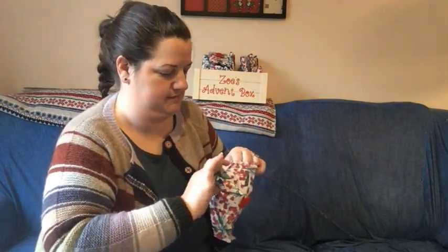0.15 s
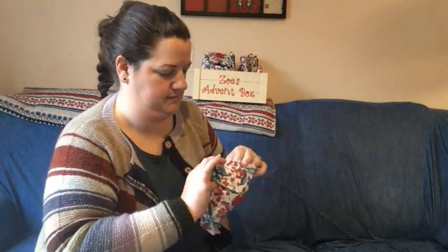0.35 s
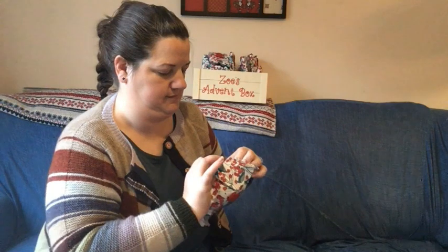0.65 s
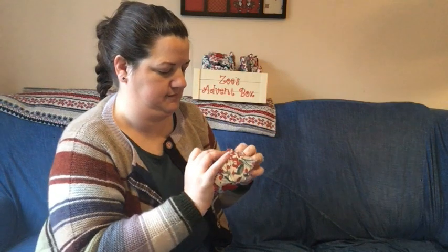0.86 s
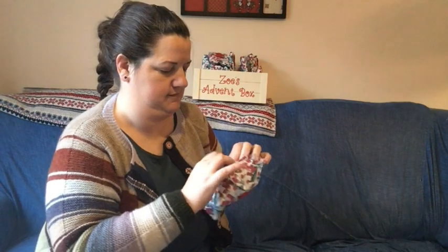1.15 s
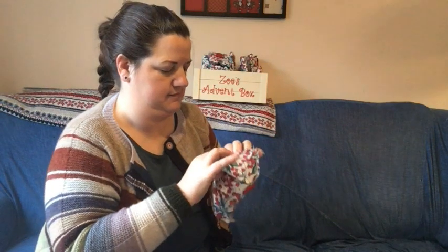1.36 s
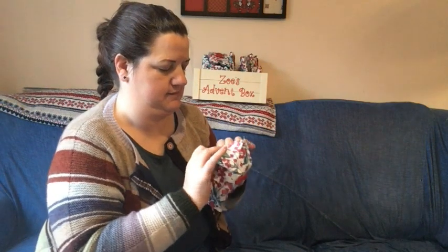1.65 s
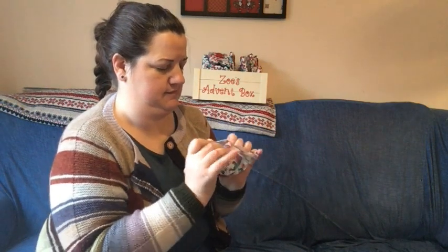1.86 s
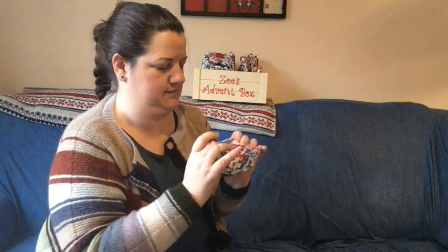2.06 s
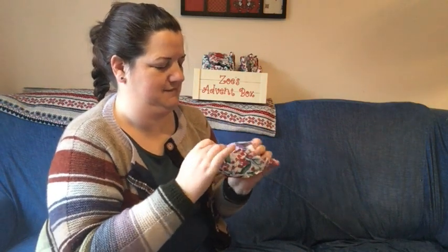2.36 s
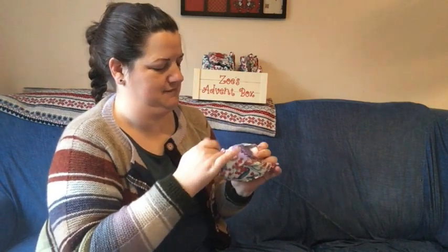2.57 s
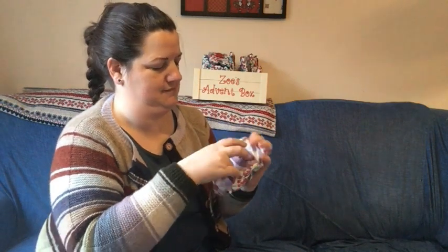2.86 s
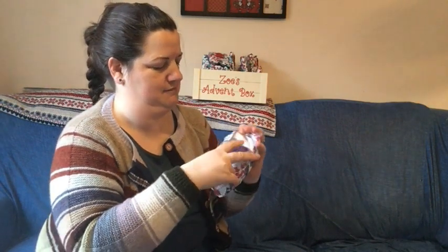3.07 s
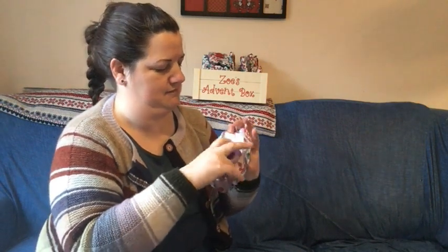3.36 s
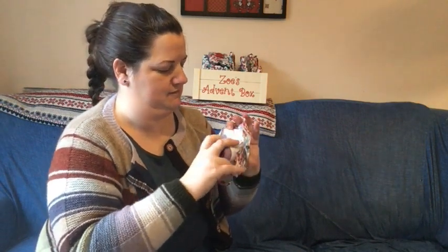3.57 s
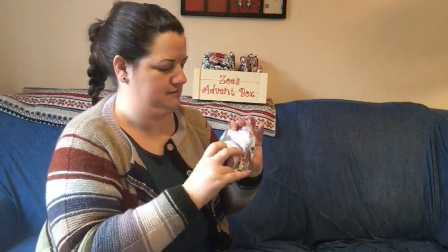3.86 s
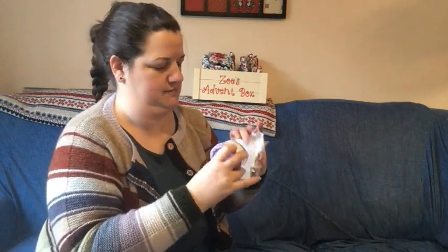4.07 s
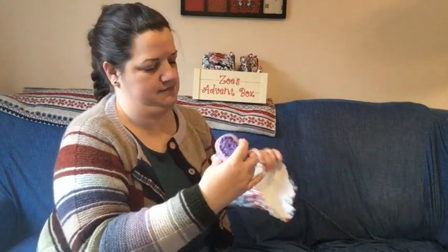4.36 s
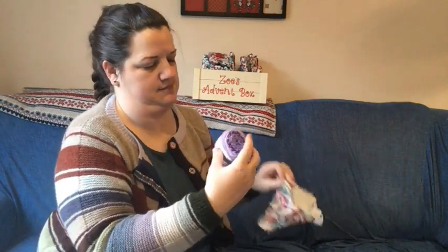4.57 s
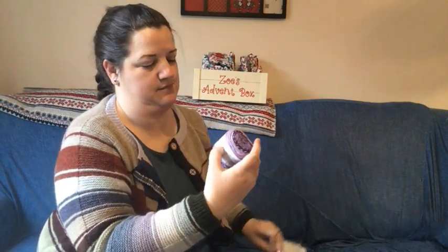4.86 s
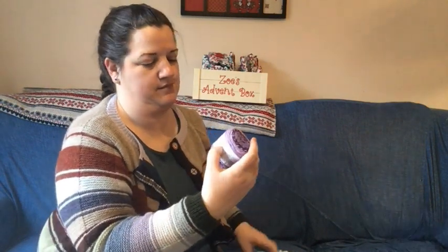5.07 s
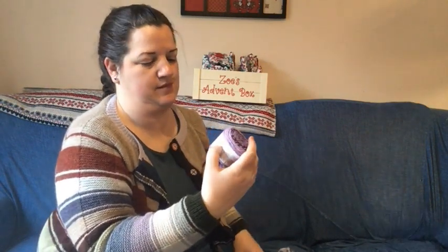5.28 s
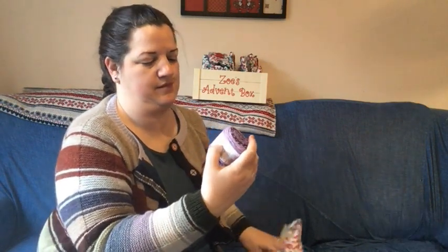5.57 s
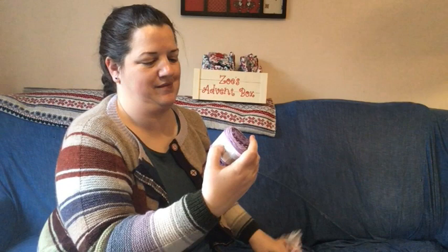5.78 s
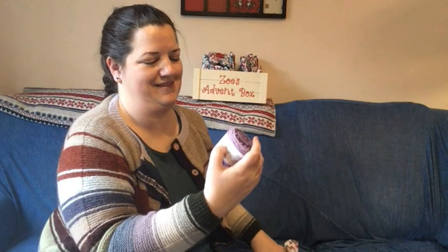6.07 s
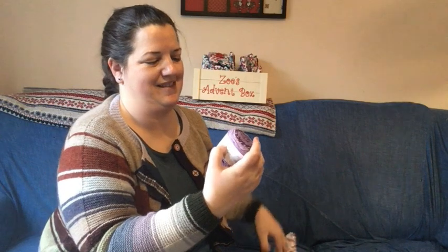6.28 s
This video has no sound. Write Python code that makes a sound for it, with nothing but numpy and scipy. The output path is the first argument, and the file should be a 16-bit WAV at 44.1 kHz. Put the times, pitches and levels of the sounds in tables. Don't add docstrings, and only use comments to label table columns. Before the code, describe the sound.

Stiff wrapping paper crackles and snaps close by as a small gift is unwrapped, rips sharply, then is pushed down onto a soft cushion.

```python
import sys
import numpy as np
from scipy import signal
from scipy.fft import rfft, irfft, next_fast_len
from scipy.io import wavfile

SR = 44100
rng = np.random.default_rng(int(sys.argv[2]) if len(sys.argv) > 2 else 0)


def how_loud(loudness_db):
    steps = np.asarray(loudness_db, float) / 20
    return 10 ** steps


def pcm_store(signal):
    levels = np.round(np.clip(np.atleast_2d(signal), -1, 1) * 32767)
    wavfile.write(sys.argv[1], SR, levels.astype(np.int16).T)


N = 282681

# frequency in Hz, level in dB per Hz.
ROOM_TONE = [(15, -45), (30, -36), (50, 15), (120, -12), (170, 8), (309, -5.5), (489, -19), (1100, -40),
             (1520, -12), (4740, -9), (9570, -10), (19000, -28)]
# pitch in Hz, width in Hz, level in dB.
DRONE = [(95, 13, -64), (311, 73, -66.5)]
# time in seconds, crackle in dB, favoured panel pitch in Hz.
GRIP = [(0.0, -53.5, 1640), (0.07, -62, 1730), (0.36, -55, 1370), (0.6, -46.5, 1530), (0.95, -53.5, 2150),
        (1.4, -62.5, 1410), (1.63, -54, 1540), (1.85, -52, 1730), (2.15, -56, 2070), (2.6, -52.5, 1880),
        (2.95, -45.5, 2050), (3.2, -56, 1600), (4.0, -50.5, 1520), (4.2, -70, 1500), (4.72, -69.5, 1700),
        (5.3, -59, 2440), (5.75, -62, 1570), (6.41, -67, 1950)]
# start in seconds,
# hold in seconds, crackle in dB, fibres in dB relative to it, folds in dB relative to it.
SQUEEZES = [(0.093, 0.097, -54, -13, 5), (0.397, 0.0036, -45, -4, -6), (0.494, 0.0057, -38, -9, -23),
            (0.652, 0.017, -31.5, -1, -9.5), (0.814, 0.046, -39, -12, -34), (0.887, .004, -36, -5.5, -23),
            (1.018, 0.0096, -40, -1.5, -1), (1.226, 0.046, -54, 1.5, 9.5), (1.44, 0.034, -65, -13, 14.5),
            (1.552, 0.11, -52, -28, 8.5), (1.954, 0.06, -55, -6, 5), (2.274, 0.041, -38.5, -4.5, -11),
            (2.304, 0.14, -43, 4, -5.5), (2.666, 0.0023, -47, -10, -21), (2.734, .06, -47.5, -11, 7),
            (2.878, 0.091, -45.5, -1, -27), (2.982, 0.05, -39, -3, 2.5), (3.208, 0.018, -41.5, -8, -2.5),
            (3.288, 0.15, -53.5, 2, -16), (4.02, 0.056, -55.5, -6, 4), (4.076, 0.024, -58.5, 4.5, -17),
            (4.394, 0.019, -53, -3.5, -14), (4.497, 0.026, -57, -1.5, -5),
            (4.798, 0.098, -52.5, -0.5, -7), (4.885, 0.03, -48, -6, 0), (4.956, 0.12, -49, 2, -6),
          (5.096, 0.0035, -41.5, -17, 5.5), (5.153, 0.0018, -35.5, -6, 4.5), (5.22, .08, -49.5, -1, -27),
          (5.309, .012, -40, -0.5, -6), (5.357, 0.15, -50.5, -3, 0), (5.559, 0.022, -40, -5, -11),
          (5.722, 0.074, -42.5, -7, -6), (5.928, 0.076, -58.5, 3, 8), (6.108, 0.063, -59, 6, 3.5),
          (6.288, 0.0037, -46.5, -2.5, 6), (6.346, .08, -54, -35, -4)]
# hold in seconds, crackle in dB, fibres and folds each in dB relative to it.
RIP = (0.1055, -27.5, 0, -6)
# frequency in Hz, level in dB per Hz.
FIBRES = [(2500, -41), (3600, 0.5), (4600, -13.5), (5200, -9.5), (6500, -4.5), (9500, -7), (10600, -13.5),
          (12000, -13), (14000, -24.5), (19000, -3)]
# start in
# seconds, peak in dB, panel pitch in Hz, bright edge in dB relative to the peak.
CREASE_SNAPS = [(0.0853, -11.5, 1850, -15), (0.1609, -39, 1400, 11.5), (0.2088, -33, 1000, -1),
                (0.2383, -26.5, 630, -2), (0.382, -33, 2780, -15), (0.4014, -21.5, 2520, -18),
                (0.4691, -10, 1110, -3), (0.4705, 0, 1630, -18), (0.4747, -2.5, 3640, -29),
                (0.5818, -13.5, 2220, -1), (0.6074, -25, 1290, 4), (0.6483, -5, 1130, 0.5),
                (0.6599, -5.5, 1700, -22), (0.6982, 0, 1260, -11), (0.7576, -24, 1090, -24),
                (0.8194, -23, 1300, 2), (0.8358, -22, 1320, -29), (0.8995, -7, 3050, -20),
                (0.9168, -21.5, 820, -3), (1.014, -14, 3100, 5), (1.0235, -22, 880, 2),
                (1.027, -19.5, 1170, -15), (1.2313, -25, 1160, -10), (1.3417, -30.5, 1190, -12),
                (1.431, -33, 3250, 8), (1.523, -34.5, 730, -2), (1.5375, -23.5, 2920, -9),
                (1.5494, -11, 1320, -41), (1.5837, -32, 1430, -16), (1.6186, -19, 1500, -32),
                (1.67, -4, 2310, -26), (1.677, 0, 1600, 3.5), (1.686, 1, 3830, -22), (1.8261, -14, 2580, -24),
              (1.906, -20, 1330, -23), (1.9308, -24.5, 2700, 7), (1.962, -25, 2340, -24),
              (1.967, -27.5, 7140, -11), (2.0144, -24.5, 1900, -9), (2.0436, -26.5, 780, -21),
              (2.1804, -12, 3930, -6), (2.1813, -13, 1760, -9), (2.2455, -25, 2490, 4),
              (2.2666, -18, 2120, 0), (2.31, -18, 1650, 1), (2.3894, -23, 1980, 11),
              (2.4447, -27, 1940, -1), (2.6535, -20.5, 865, -21), (2.727, -27, 1150, -13),
              (2.7412, -19.5, 1100, 3), (2.7883, -17, 830, 5.5), (2.8302, -25, 2350, -13),
              (2.9857, -5, 1920, 4.5), (2.988, -10, 3230, -7), (3.0358, -14, 920, -24),
              (3.1977, -16, 1850, -3), (3.1989, -25, 1850, -17), (3.304, -25.5, 2830, 8),
              (3.3427, -22, 1700, 1), (3.4879, -26.5, 1630, -24),
                (4.19, -39.5, 443, -16), (3.9432, -24.5, 1880, 2.5), (4.0177, -21.5, 980, 1),
              (4.2095, -41, 7210, -12), (4.384, -41, 1130, 2), (4.42, -34.5, 1090, -1),
              (4.501, -39, 880, 6), (4.8264, -35.5, 6290, 8.5), (4.8875, -29, 1610, 13.5),
              (4.9686, -16.5, 2940, 1), (5.1002, -18.5, 3200, -11), (5.1044, -27, 1260, -12),
              (5.1452, -9, 3560, 5.5), (5.1485, -7, 1680, -2.5), (5.2976, -15.5, 7260, -15),
              (5.3035, -15.5, 3840, -9), (5.3234, -22.5, 885, -8), (5.4653, -21.5, 1950, 7),
              (5.474, -27, 4630, -25), (5.565, -18.5, 1790, -21), (5.666, -31, 3060, -6),
              (5.714, -28.5, 1300, 2.5), (5.7283, -35, 1220, 2), (5.7878, -8.5, 1740, -27),
              (5.859, -36, 2610, 6.5), (5.9346, -4.5, 2650, -3.5), (5.9412, -19, 2930, -19),
              (6.1277, -28.5, 3400, 1), (6.288, -25, 960, -1), (6.2893, -23, 2580, -21)]
# frequency in Hz, time to fall 60 dB in seconds.
ROOM_T60 = [(300, 0.3), (800, 0.24), (2100, 0.26), (5500, 0.29), (14000, 0.19)]
# start in seconds, end in seconds, gap in seconds, peak in dB,
# panel pitch in Hz.
SLIPS = [
    (2.301, 2.46, .042, -17.5, 2000),
    (3.555, 3.92, .034, -34, 1610),
]
# start in seconds, peak in dB, pitch in Hz.
THUDS = [
    (2.439, -49, 73),
    (3.937, -44, 153),
    (4.95, -42, 99.6),
    (5.069, -40, 72),
    (5.148, -34.5, 75.4),
    (5.29, -49, 83),
    (5.705, -39, 99),
    (5.807, -41, 92),
    (5.939, -44, 93),
]
# frequency in Hz, width in Hz, depth in dB.
MIC_DIPS = [(778, 157, -4), (10530, 670, -2)]


def rms_one(x):
    return x / np.sqrt(np.mean(x ** 2) + 1e-20)


def at_hz(points, hz):
    table_hz, values = np.transpose(points)
    return np.interp(np.log(hz + 1), np.log(table_hz), values)


def coloured(x, spectrum):
    size = next_fast_len(len(x))
    gain = how_loud(at_hz(spectrum, np.fft.rfftfreq(size, 1 / SR)))
    return irfft(rfft(x, size) * gain, size)[:len(x)]


def drift(rate_hz):
    r = np.exp(-2 * np.pi * rate_hz / SR)
    noise = rng.standard_normal(N + SR)
    return rms_one(signal.lfilter([1], [1, -2 * r, r * r], noise)[SR:])


def ring(clicks, hz, t60):
    r = how_loud(-60 / (t60 * SR))
    w = 2 * np.pi * hz / SR
    return signal.lfilter([0, np.sin(w)], [1, -2 * r * np.cos(w), r * r], clicks + 1e-18)


def room_tone():
    out = how_loud(-61 - 7) * rms_one(coloured(rng.standard_normal(N), ROOM_TONE))
    for hz, width_hz, level_db in DRONE:
        out = out + how_loud(level_db) * rms_one(ring(rng.standard_normal(N), hz, 2.2 / width_hz))
    return out


def handling():
    t = np.arange(N // 32 + 1) * 32 / SR
    s, grip_db, panel_hz = np.transpose(GRIP)
    layers_db = np.array([[0], [-7], [-3]])
    power = how_loud(2 * (np.interp(t, s, grip_db) + layers_db))
    moves = [(row, 486, 304) for row in SQUEEZES]
    moves.append(((1.674, *RIP), 2500, 526))
    for (at, hold, level_db, fibre_db, fold_db), rise, fall in moves:
        shape_db = level_db - rise * np.maximum(at - t, 0) - fall * np.maximum(t - at - hold, 0)
        sag_db = 65 * np.maximum(t - at, 0)
        power = power + how_loud(2 * np.array([shape_db, shape_db + fibre_db, shape_db + fold_db - sag_db]))
    curves = (*(10 * np.log10(power)), np.interp(t, s, panel_hz))
    return [np.interp(np.arange(N) / SR, t, curve) for curve in curves]


def grains(per_s, spread_db, clumps_db):
    sizes = how_loud(spread_db * np.minimum(rng.exponential(1, N), 4)) * rng.choice([-1, 1], N)
    return sizes * (rng.random(N) < per_s / SR) * how_loud(clumps_db)


def panels(clicks, low_hz, high_hz, cycles, count, favoured_hz, focus_db, grip_db):
    dealt = rng.integers(0, count, N)
    grip = drift(2.8)
    out = 0
    for k, hz in enumerate(np.geomspace(low_hz, high_hz, count)):
        freed_db = grip_db * np.roll(grip, k * N // count)
        share = how_loud(freed_db - focus_db * np.log2(hz / favoured_hz) ** 2)
        out = out + ring(clicks * share * (dealt == k), hz, cycles / hz) / np.sqrt(cycles / hz)
    return out


def crackle():
    crackle_db, fibre_db, fold_db, panel_hz = handling()
    denser = how_loud(0.03 * (crackle_db + 48.5))
    clumps_db = 0.22 * drift(42) + 1.6 * drift(86)
    middle = panels(grains(1500 * denser, 1.9, clumps_db + 0.31 * drift(60)), low_hz=706, high_hz=4530,
                    cycles=25.5, count=24, favoured_hz=panel_hz, focus_db=4.0, grip_db=2.0)
    fibres = coloured(grains(9000, 2.2, clumps_db + 2.2 * drift(60)), FIBRES)
    folds = panels(grains(700, 2.93, clumps_db), low_hz=250, high_hz=810,
                   cycles=9.1, count=10, favoured_hz=597, focus_db=6.0, grip_db=5.5)
    out = how_loud(crackle_db + 1.07) * rms_one(middle / np.sqrt(denser))
    out = out + how_loud(fibre_db + 1.9) * rms_one(fibres)
    return out + how_loud(fold_db + 0.27) * rms_one(folds)


def ticks(count=260):
    crackle_db, _, _, panel_hz = handling()
    at = (rng.random(count) * N).astype(int)
    chance = rng.standard_normal((count, 3))
    peak_db = np.minimum(crackle_db[at] + 13 + 3.5 * chance[:, 0], -25)
    hz = panel_hz[at] * 2 ** (0.51 * chance[:, 1] - 0.3)
    edge_db = -4 + 7 * chance[:, 2]
    return list(zip(at / SR, peak_db, hz, edge_db))


def snaps(cycles=6.9, upper=1.64, soft=2.13):
    size = 1024
    out, t = np.zeros(N + size), np.arange(size) / SR
    creases = CREASE_SNAPS + ticks() + slips()
    chance = rng.standard_normal((len(creases), size))
    luck = rng.random((len(creases), size))
    for (s, peak_db, hz, edge_db), noise, draw in zip(creases, chance, luck):
        lasts_ms = 1.0 - 0.1931 * min(peak_db, 0)
        struck = draw < 5000 / SR
        blows = how_loud(-1.5) * noise * struck * np.exp(-1000 * t / lasts_ms)
        blows[0] = 2.16 * np.sign(noise[0])
        panel = ring(blows, hz, cycles / hz)
        panel = panel + how_loud(-7.0) * ring(blows, min(upper * hz, 15000), cycles / hz / upper)
        push_band = [hz / soft, min(hz * soft * upper, 18000)]
        panel = signal.lfilter(*signal.butter(2, push_band, "band", fs=SR), panel)
        edge_band = [4300, 8000 + 8500 * draw[0]]
        edge = signal.lfilter(*signal.butter(2, edge_band, "band", fs=SR), blows)
        at = int(s * SR)
        out[at:at + size] += how_loud(peak_db - 4.5) * panel / np.abs(panel).max()
        out[at:at + size] += how_loud(peak_db + edge_db - 5.5) * edge / np.abs(edge).max()
    return out[:N]


def room(x, first_echo_s=0.002):
    t = np.arange(SR // 2) / SR
    present = rng.random(len(t)) < 0.015 + 8.0 * t
    echoes = rng.standard_normal(len(t)) * present / np.sqrt(np.minimum(0.0078 + 8.0 * t, 1))
    echoes = echoes * (t > first_echo_s)
    edges = 60 * 2 ** np.arange(0, 8.6, 1.0)
    tail = 0
    for low, high in zip(edges, edges[1:]):
        band = signal.sosfilt(signal.butter(2, [low, high], "band", fs=SR, output="sos"), echoes)
        tail = tail + band * how_loud(-60 * t / at_hz(ROOM_T60, np.sqrt(low * high)))
    return signal.fftconvolve(x, tail / np.sqrt(np.sum(tail ** 2)))[:N]


def slips():
    rows = []
    for start, end, gap, peak_db, hz in SLIPS:
        chance = rng.standard_normal((16, 4))
        at = start + gap * (np.arange(16) + 0.28 * chance[:, 0])
        for s, c in zip(at, chance):
            if s < end:
                rows.append((s, peak_db + 3.0 * c[1], hz * 2 ** (0.06 * c[2]), -9 + 8.2 * c[3]))
    return rows


def thuds(t60=0.12, onset_s=0.0046):
    t = np.arange(SR // 4) / SR
    out = np.zeros(N + len(t))
    for s, peak_db, hz in THUDS:
        at = int(s * SR)
        push = how_loud(peak_db - 60 * t / t60) * (1 - np.exp(-t / onset_s))
        out[at:at + len(t)] += push * np.sin(2 * np.pi * hz * t)
    return out[:N]


def scene():
    sheet = signal.butter(2, 220, "high", fs=SR, output="sos")
    paper = signal.sosfilt(sheet, snaps() + crackle())
    return (paper + how_loud(-7.5) * room(paper) + thuds() + room_tone())[None]


def band_limit(x):
    return signal.sosfilt(signal.butter(12, 16660, fs=SR, output="sos"), x)


def record(dry):
    for hz, width_hz, depth_db in MIC_DIPS:
        peak = signal.lfilter(*signal.iirpeak(hz, hz / width_hz, fs=SR), dry)
        dry = dry - (1 - how_loud(depth_db)) * peak
    cut = signal.sosfilt(signal.cheby2(20, 50, 16050, fs=SR, output="sos"), dry)
    return band_limit(cut)


dry = scene()
out = record(dry)
pcm_store(out)
```